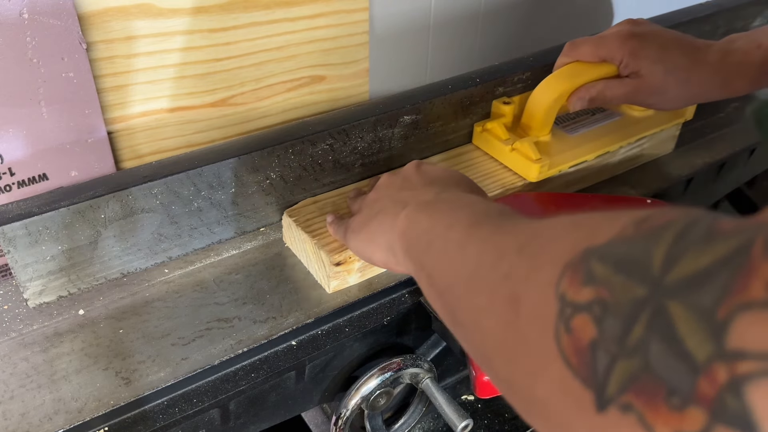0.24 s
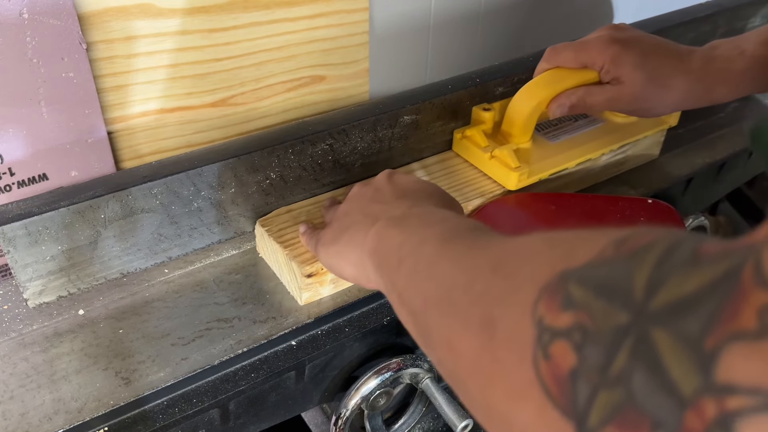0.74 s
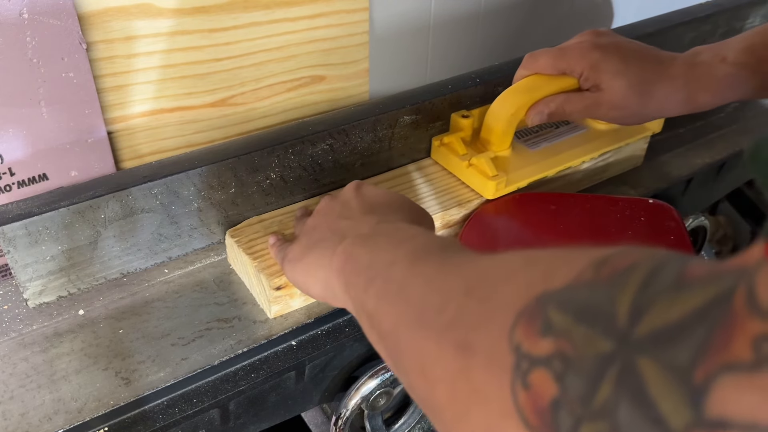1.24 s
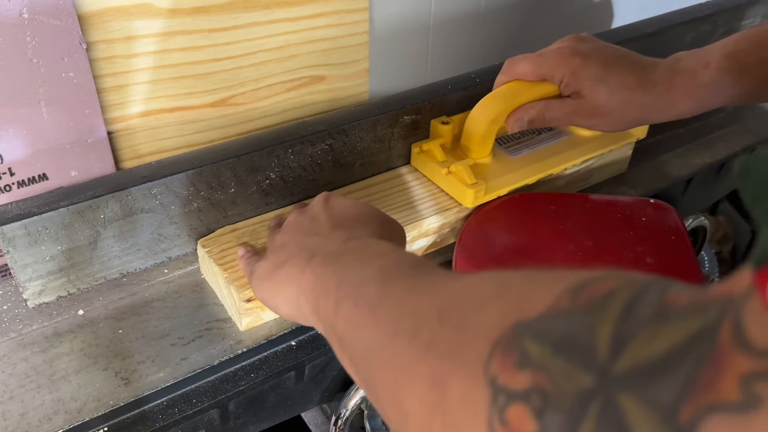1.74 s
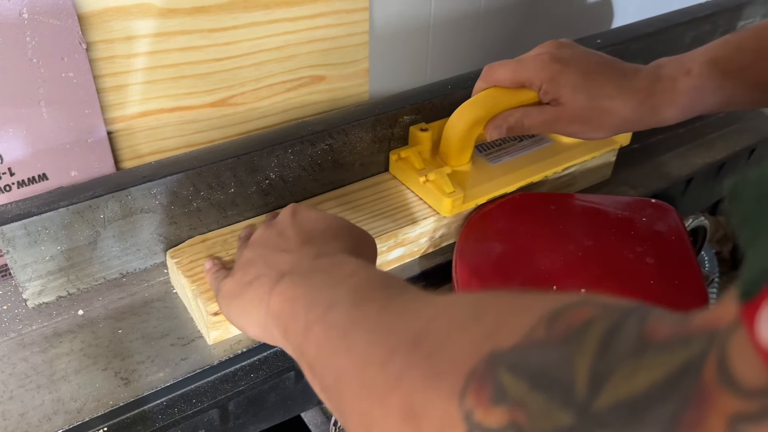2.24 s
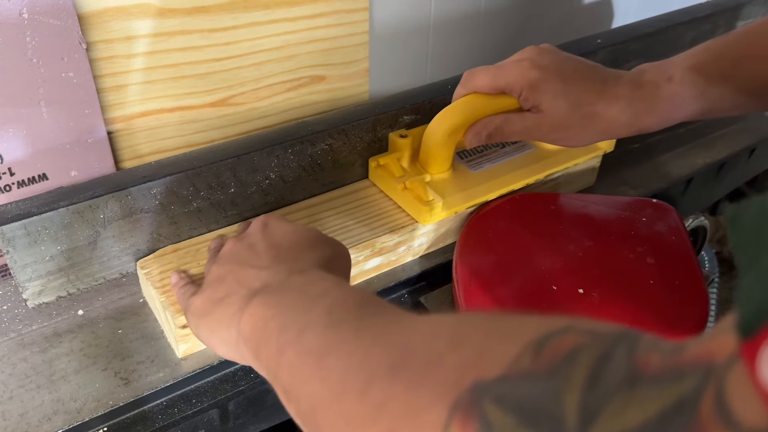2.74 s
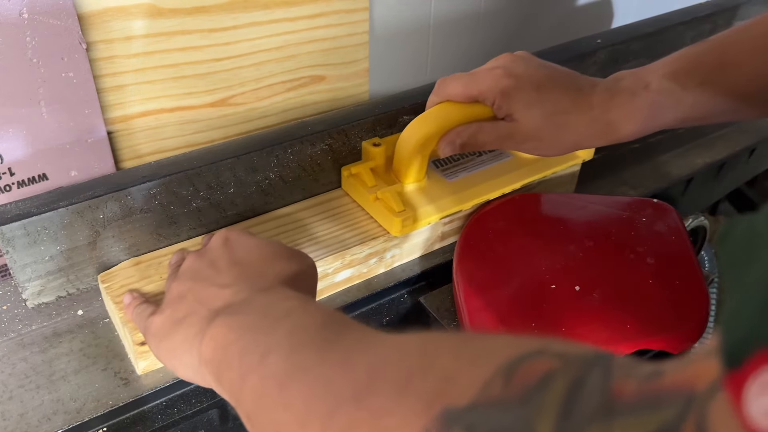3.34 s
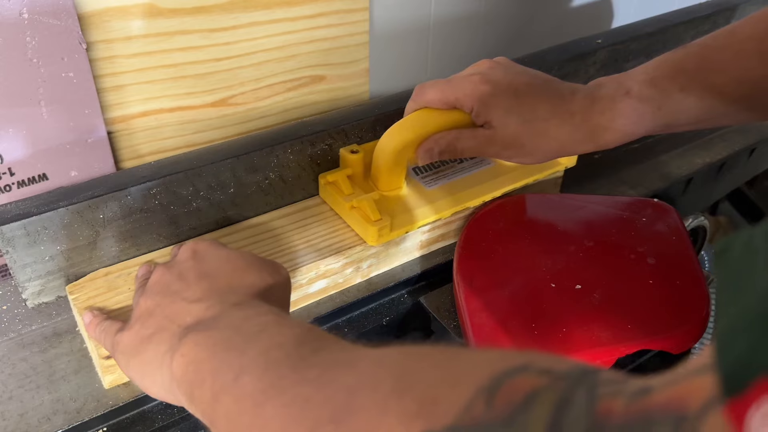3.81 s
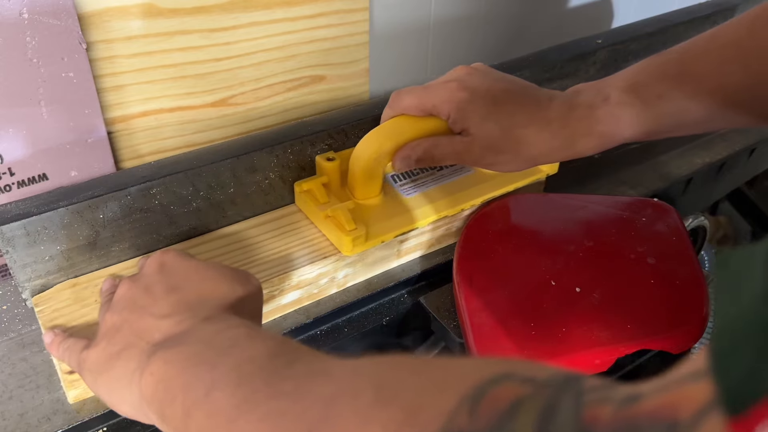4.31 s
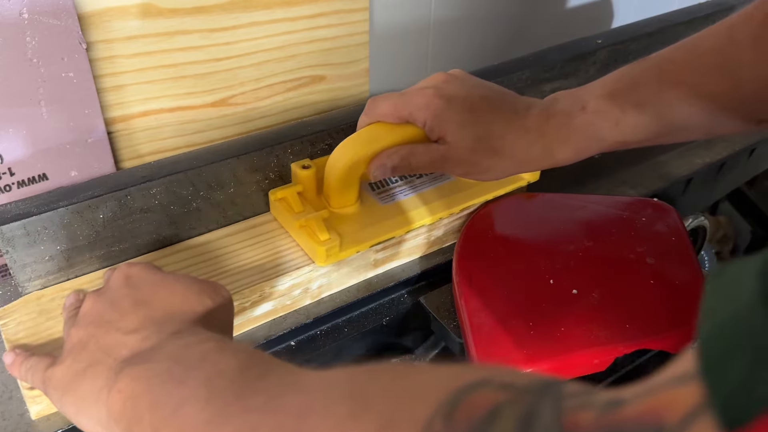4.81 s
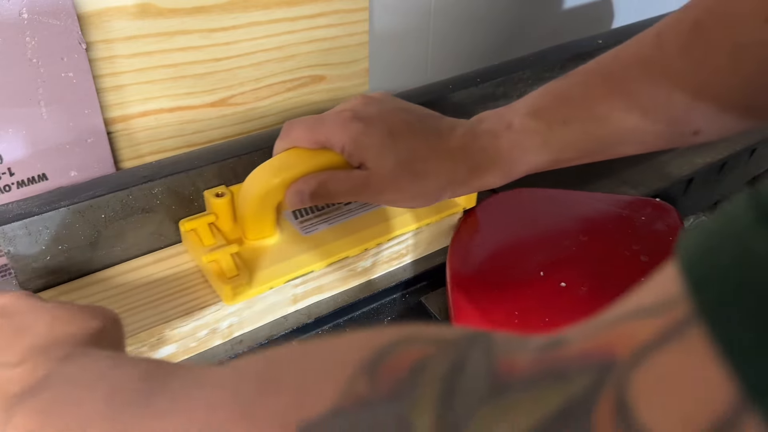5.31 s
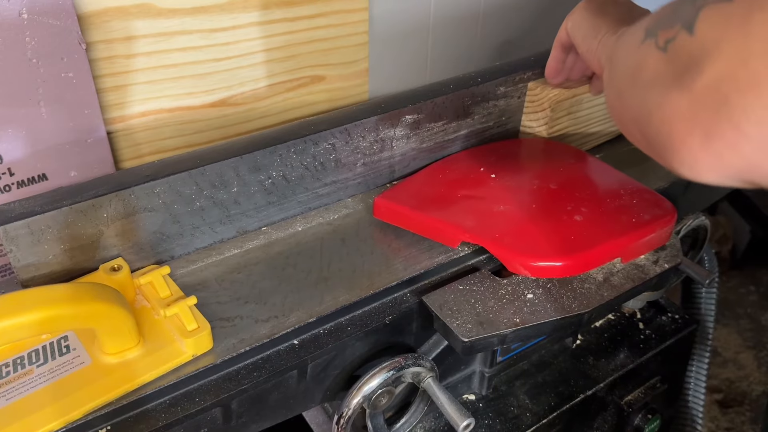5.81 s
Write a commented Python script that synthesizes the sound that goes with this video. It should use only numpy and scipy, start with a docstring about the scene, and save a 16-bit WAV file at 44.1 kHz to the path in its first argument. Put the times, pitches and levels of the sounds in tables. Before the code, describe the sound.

A loud continuous planing drone, raspy and nasal, fills the first five seconds, with spitting wood chips and changing tone as the board moves over spinning knives. It swells to a short harsh shriek, then drops suddenly to smooth, much quieter idling: low hum, soft whine and fan-like air. Close stereo microphone, short diffuse workshop echo; the idle steps up after a tiny dip.

```python
"""A three-knife jointer planes a board, heard close by in stereo, then runs free.
The knives strike the wood each turn of the cutter head: tones at multiples of its speed, and hissing chips.
The load drags the belt-driven head down; once the board leaves, the head speeds up and rings on briefly.
Then the bare knives whine in air over motor tones and rushing air; a brief dip leads to louder idling.
Tones are summed cosines, hiss and air are shaped noise, and decaying noise gives the workshop's echoes."""
import sys
import numpy as np
from scipy import signal
from scipy.fft import rfft, irfft
from scipy.io import wavfile
from scipy.ndimage import uniform_filter1d

SR = 44100
rng = np.random.default_rng(int(sys.argv[2]) if len(sys.argv) > 2 else 0)


def int16_out(signal):
    """Quantize to a 16-bit WAV file."""
    q = np.round(np.clip(np.atleast_2d(signal).T, -1, 1) * 32767)
    wavfile.write(sys.argv[1], SR, q.astype(np.int16))


def volts(x):
    """Linear amplitude factor 10**(x/20) for a level x in dB, scalar or array-like."""
    e = np.asarray(x, float) / 20
    return 10 ** e


N = 267246
T = np.arange(N) / SR  # time in seconds
JUMP_S = 5.447  # the idling turns louder here
BLOW_AT = .06  # place in the turn (0-1) where the tones of the blow meet

# Average tones of the board, relative to each other. Each row: multiple of the head speed, level in dB.
BLOW_TONES = [(4, -27), (5, -31), (7, -19), (8, -23.5), (9, -8), (10, -23), (11, -16), (12, -10.5),
              (13, -25), (14, -12), (15, -1), (16, -21.5), (17, -16.5), (18, -12.5), (19, -24), (20, -26.5),
              (21, -16.5), (22, -17), (23, -24.5), (24, -21.5), (25, -29), (26, -34), (27, -23),
              (28, -24.5), (29, -35), (30, -22.5), (31, -29), (32, -21), (33, -24), (34, -56), (35, -28),
              (36, -29.5)]
# Hard bites of a knife. Each row: start in seconds, level in dB.
CATCH = [(3.731, -17), (3.768, -19), (3.929, -19), (3.979, -13), (4.003, -14)]
# How far the left port leads the right. Each row: frequency in Hz, lead in radians.
LEAD = [(100, 0), (250, .3), (480, .3), (780, -.3), (1000, 1.3), (1640, 1.2), (2150, .7), (2840, 1.6),
        (4480, .5), (5770, 1.2), (7240, 1.5), (7920, 0), (9300, -.5), (9900, -2.4)]
# How much louder the left port is than the right. Each row: frequency in Hz, difference in dB.
LEFT = [(60, -0.5), (250, -0.5), (480, 6), (730, -1.5), (1200, 1.5), (2400, 4), (4400, 4.5), (7200, 7.5),
        (8200, 2)]


def evened(x):
    """Scales to rms 1."""
    return x / np.sqrt(np.mean(x ** 2) + 1e-20)


def read(points, hz):
    """Reads a spectrum table on a log-frequency axis."""
    f, value = np.transpose(points)
    return np.interp(np.log(hz + 1), np.log(f + 1), value)


def curves(rows):
    """Columns of a time table at every sample."""
    s, *columns = np.transpose(rows)
    return [np.interp(T, s, c) for c in columns]


def wander(rate_hz, count):
    """Slow random change of rms 1, in count rows."""
    knots = rng.standard_normal((int(N / SR * rate_hz) + 4, count)).T
    smooth = signal.resample(knots, N // 64 + 1, axis=1)
    return evened(smooth).repeat(64, 1)[:, :N]


def swell(rows, hz, t):
    """dB by which ranges of frequencies rise and sink in time, most at the middle of each range."""
    return sum(db * np.cos(2 * np.pi * (t - s) / gap) / (1 + (2 * (hz - f) / w) ** 2)
               for f, w, db, s, gap in rows)


def heard(x, spectrum):
    """Colours two signals and mixes them into what two ports hear: partly alike, with their own level and lead."""
    # How alike the ports are. Each row: frequency in Hz, likeness from 0 to 1.
    alike_ports = [(60, 0.9), (250, 0.6), (640, 0.6), (3100, 0.36), (7400, 0.62), (8200, .97)]
    hz = np.fft.rfftfreq(N, 1 / SR)
    a, b = rfft(x)
    same = np.clip(read(alike_ports, hz), 0, 1)
    side = volts(read(LEFT, hz) / 2) * np.exp(.5j * read(LEAD, hz))
    pair = np.array([a * side, (same * a + np.sqrt(1 - same ** 2) * b) / side])
    return evened(irfft(pair * volts(read(spectrum, hz)), N))


def tone(turns, hz, rms, sway_db=0, sway=0):
    """One cosine at both ports; rms is that of their mean unless they nearly cancel; sway shifts it sideways."""
    side = np.array([[.5], [-.5]])
    pair = volts(side * (read(LEFT, hz) + sway_db)) * np.exp(1j * side * (read(LEAD, hz) + sway))
    pair = pair / np.maximum(abs(pair.mean(0)), .4)
    return np.sqrt(2) * rms * abs(pair) * np.cos(2 * np.pi * turns + np.angle(pair))


def knock(s, db, modes):
    """A short blow: a struck thing rings at a few frequencies, each dying at its own pace."""
    t = np.clip(T - s, 0, .3)
    attack = 1 - np.exp(-t / .001)
    return -sum(volts(db + mode_db - 60 * t / t60) * attack * np.sin(2 * np.pi * hz * t)
                for hz, mode_db, t60 in modes)


def since_throb(x):
    """A running count, zero where the idle throb is loudest, so that the whine and a motor tone meet there."""
    # Moment of that throb in seconds: before the jump, after it.
    throb_s = (5.345, 5.54)
    return x - np.where(T < JUMP_S, *np.interp(throb_s, T, x))


def board_levels(order, t):
    """dB of each multiple of the head speed, as the board favours some tones and starves others."""
    # Ranges that swell and fade as the knives pass along the board. Each row: centre in Hz,
    # width in Hz, depth in dB, loudest moment in seconds, seconds from swell to swell.
    board_swell = [(415, 290, 12.5, 7.9, 13.4), (686, 62, 14, 0.68, 3.93), (1008, 91, 17, 4.16, 6.33),
                   (1181.5, 111, 17.5, 6.67, 12.2), (1137, 434, 15.5, 0.72, 5.93),
                   (1489, 163, 13, 1.92, 6.1), (1604, 406, 20, 5.09, 7.5), (1743, 127, 16.5, 0.89, 6.02),
                   (1980, 86, 5, 2.37, 2.13), (2360, 860, 9.5, 1.44, 3.63), (2650, 89, 13.5, 6.34, 10.9),
                   (3020, 1900, 5, 0.027, 2.39), (2424, 50, 4, 0.45, 3.6), (2672, 50, 4.5, 4, 3.6),
                   (1780, 43, 7.5, 2.75, 5)]
    # Near the end the tones shift into a growl. Each row: multiple of the head speed, change in dB.
    growl = [(4, 7), (5, 8), (7, 3), (8, 3), (11, 3), (13, 10), (14, -1.5), (16, -13)]
    # Tones between the knife tones near 1 kHz, as the knives bite unevenly. Each row: seconds, change in dB.
    uneven = [(3.2, 1.5), (3.5, 4.5), (3.62, 2), (3.77, 5.5), (3.81, -14), (3.9, -1), (4.01, -4),
              (4.05, -8), (4.4, -2.5), (4.7, 1)]
    growl_s, growl_rise_s = 3.7, .14
    end_s, end_hz, end_octaves_per_s, end_db, end_rise_s = 4.815, 1420, 6.2, 9.5, .034
    dull_hz, dull_s, dull_fall_s, dull_db = 1150, 4.845, .047, -30

    hz = order[:, None] * 81
    between = hz % 243 > 0  # not a multiple of three: a tone between the knife tones
    levels = np.transpose(BLOW_TONES)[1][:, None] + swell(board_swell, hz, t)
    growl_change = sum(db * (order[:, None] == k) for k, db in growl)
    levels = levels + growl_change * np.clip((t - growl_s) / growl_rise_s, 0, 1)
    levels = levels - 10 * np.log10((volts(levels) ** 2).sum(0))  # the same total power at all times

    # the short last piece of board rings ever higher and louder
    since = np.maximum(t - end_s, 0)
    ring_hz = end_hz * 2 ** (end_octaves_per_s * since)
    near_ring = np.exp(-(np.log(hz / ring_hz) / .2) ** 2)
    levels = levels + np.minimum(since / end_rise_s, 1) * end_db * np.where(between, .75, 1) * near_ring

    # the board's main ring dies first
    near_main = np.exp(-(np.log(hz / dull_hz) / .11) ** 2)
    levels = levels + np.clip((t - dull_s) / dull_fall_s, 0, 1) * dull_db * near_main
    return levels + (between & (hz > 850) & (hz < 1400)) * np.interp(t, *np.transpose(uneven))


def board_chatter(turns):
    """Four rows of uneven blow strength: a chattering board lifts on every second turn and shakes at random."""
    # Bursts of chatter. Each row: peak in seconds, strength added, rise in seconds.
    bursts = [(3.63, .08, .06), (3.77, .12, .06), (3.93, .12, .03), (4.0, .15, .04)]
    always, fall_s = .11, .03
    bounce = np.cos(np.pi * turns)
    shake = wander(70, count=4)
    shake = shake - uniform_filter1d(shake, 3000, axis=1)
    strength = always + sum(a * np.exp(-abs(T - s) / np.where(T < s, rise, fall_s))
                            for s, a, rise in bursts)
    return strength * (.5 * bounce + 1.2 * shake)


def knives(turns, blows_db, left_db):
    """Knife blows as tones at multiples of the head speed, gliding in strength as the board travels."""
    # Hum of the passing knives, whatever the cut. Each row: multiple of the head speed, level in dB.
    passing_hum = [(3, -34), (6, -38)]
    # Ranges where the board moves against the blow. Each row: from Hz, to Hz.
    opposed = [(440, 600), (1500, 2000)]
    # all in cycles: swing of the blow, lead or lag of the tones between the knife tones,
    # scatter, extra scatter of the tones between the knife tones
    swing, between_lead, scatter, loose_scatter = .18, .08, .07, .2
    loose_s, loose_rise_s = 1.9, 1.2  # when that extra scatter starts, how long it grows

    t = T[::256]
    order = np.transpose(BLOW_TONES)[0]
    levels = board_levels(order, t)
    drift = wander(.4, count=2 * len(order)).reshape(2, -1, N)
    start = rng.standard_normal(len(order))
    shake = board_chatter(turns)
    loose = loose_scatter * np.clip((T - loose_s) / loose_rise_s, 0, 1)
    out = sum(tone(k * (turns - BLOW_AT), k * 81, volts(db)) for k, db in passing_hum)
    for k, db, pan, lead, s in zip(order, levels, *drift, start):
        roughness = 1 + shake[int(k) // 10] * min(k / 10, 1) ** 2
        size = roughness * volts(np.interp(T, t, db) + blows_db)
        phase = swing + between_lead * (0, -1, 1)[int(k) % 3]
        phase = phase + (scatter + loose * (k % 3 > 0)) * s
        phase = phase + .5 * any(lo < k * 81 < hi for lo, hi in opposed)
        out += tone(k * (turns - BLOW_AT) + phase, k * 81, size, 2.5 * pan + left_db, .4 * lead)
    return out


def hard_bites(turns):
    """Single hard bites: the first knife catches the wood and the board rings shortly."""
    # What a hard bite rings with. Each row: frequency in Hz, level in dB, seconds to fall by 60 dB.
    board_modes = [(700, -5, .012), (890, 0, 0.018), (1143, 1, 0.018), (1394, -4, 0.014)]
    out = 0
    for s, db in CATCH:
        nearest_turn = np.round(np.interp(s, T, turns))
        out = out + knock(np.interp(nearest_turn + BLOW_AT, turns, T), db, board_modes)
    return out


def repeating_grain(turns):
    """Noise that repeats turn after turn, partly knife after knife, and slowly changes with the grain."""
    each_knife = np.tile(rng.standard_normal((9, 2, 182)), 3)
    each_turn = rng.standard_normal((9, 2, 546))
    grain = signal.resample(.11 * each_knife + each_turn, 4368, axis=2)
    place, at = np.arange(4368), turns % 1 * 4367
    which = T * 8 / T[-1]  # fades through the nine grains in turn
    out = 0
    for k, pair in enumerate(grain):
        share = np.cos(np.pi / 2 * np.clip(which - k, -1, 1))
        out = out + share * np.array([np.interp(at, place, g) for g in pair])
    return out


def chips(turns, hiss_db, bright, left_db):
    """Chip hiss: noise puffed out at each knife, partly repeating turn after turn while the grain stays alike."""
    # The three knives. Each row: place in the turn from 0 to 1, bite in dB, length in turns.
    knife_bites = [(.03, -9, 0.094), (.36, -17, 0.19), (.69, -11.5, 0.062)]
    # Sharp cracks that open the bites. Each row: place in the turn from 0 to 1, level in dB
    # before the hiss raises or lowers it, decay in turns.
    crack_rows = [(.0, -7.5, 0.012), (.07, -13, 0.016), (.34, -19, .02), (0.669, -13.5, 0.026)]
    # Colour of the repeating part of the noise. Each row: frequency in Hz, gain in dB.
    repeat_share = [(2900, -30), (3150, 3), (4500, 2), (6000, -1), (7500, -8)]
    # Resonances in the hiss. Each row: centre in Hz, width in Hz, boost in dB.
    hood_rings = [(3526, 93, 7), (3970, 350, 4), (5120, 1300, 3.5), (5930, 130, 4), (6670, 300, 3),
                  (7220, 370, 6), (8110, 310, 7.5), (8700, 220, 8.5)]
    # Ranges of hiss that swell and fade. Each row: centre in Hz, width in Hz, depth in dB,
    # loudest moment in seconds, seconds from swell to swell.
    hiss_swell = [(3440, 260, 1.5, 1.9, 12), (4640, 1600, 2, 0.53, 7.5), (5400, 880, 4, 6.3, 11.2),
                  (6020, 290, 3.5, 4.1, 8.2), (7700, 390, 1.5, 6.7, 7.1), (8660, 270, 1.5, 3.9, 4.7)]
    # Shape of the dull chip noise. Each row: frequency in Hz, relative level in dB per Hz.
    dull_shape = [(200, -26), (500, -13), (1200, 7.5), (2000, -0.5), (3000, -14.5), (5000, -12.5),
                  (7000, -5), (8800, -4.5), (10500, -1), (15000, -28.5)]
    # Shape of the bright chip noise. Each row: frequency in Hz, relative level in dB per Hz.
    bright_shape = [(200, -23), (500, -21.5), (1200, -22), (2600, 2.5), (3800, -5.5), (5500, -4.5),
                    (7000, -9), (8800, -9), (10500, -7), (15000, -8)]
    soft_hiss_db = -31.5

    # the louder the hiss, the less of it lies between the bites and the more it cracks
    bite = .32 * volts(.51 * (soft_hiss_db - hiss_db))
    for at, db, length in knife_bites:
        distance = (turns - at + .5) % 1 - .5
        bite = bite + volts(db) * np.exp(-.5 * (distance / length) ** 2)
    crack = sum(volts(db) * np.exp(-((turns - at) % 1) / decay) for at, db, decay in crack_rows)
    bite = bite + volts(1.5 * (np.minimum(hiss_db, -27) - soft_hiss_db)) * crack

    hz = np.fft.rfftfreq(N, 1 / SR)
    repeating = irfft(rfft(bite * repeating_grain(turns)) * volts(read(repeat_share, hz)), N)
    splinter = volts(1.4 * wander(150, count=1))
    drive = repeating + bite * splinter * rng.standard_normal((2, N))
    boost_db = sum(db / (1 + (2 * (hz - f) / w) ** 2) for f, w, db in hood_rings)
    drive = irfft(rfft(drive) * volts(boost_db), N)
    bins, t, z = signal.stft(drive, SR, nperseg=1024)
    z = z * volts(swell(hiss_swell, bins[:, None], t))
    drive = signal.istft(z, SR, nperseg=1024)[1][:, :N]

    share = np.clip(bright, 0, 1)
    mix = np.sqrt(1 - share) * heard(drive, dull_shape) + np.sqrt(share) * heard(drive, bright_shape)
    return volts(hiss_db + np.array([[.5], [-.5]]) * left_db) * mix


def ring_on(turns, since):
    """Knife tones linger, wavering, after the last bite and rise as the head speeds up."""
    # Each row: multiple of the head speed, level in dB before waver and decay.
    lingering = [(6, -30.5), (9, -38), (12, -30), (15, -43), (18, -39), (21, -52), (24, -39), (27, -45),
                 (30, -38)]
    t60_s = .37  # time to fall by 60 dB
    waver = wander(25, count=len(lingering))
    size = np.clip(since / .03, 0, 1) * volts(-60 * np.maximum(since, 0) / t60_s)
    return sum(tone(k * turns + rng.random(), k * 82, size * volts(db + 3.3 * w))
               for (k, db), w in zip(lingering, waver))


def guard_knock():
    """A dull knock after the board has left, perhaps the guard swinging shut: four ringing modes."""
    # Each row: frequency in Hz, level in dB, seconds to fall by 60 dB.
    guard_modes = [(497, -5, .08), (747, -6.5, 0.15), (1010, 3, 0.066), (1390, -11, 0.042)]
    return knock(4.957, -27, guard_modes)


def whine(turns, free):
    """Bare knives chop the air once the board has uncovered them: tones at multiples of the head speed."""
    # Each row: multiple of the head speed, level in dB before the jump, level in dB after it.
    air_tones = [(3, -36, -33), (5, -55, -47), (6, -39, -32), (8, -58, -55), (9, -43, -40), (10, -53, -58),
                 (12, -49, -38), (15, -56, -54), (18, -58, -48), (21, -62, -58), (24, -65, -58),
                 (27, -64, -57)]
    bare_left_db, bare_lead = -7, -.21  # from further right: left over right, radians per multiple
    waver = wander(3.2, count=len(air_tones))
    count = since_throb(turns)
    out = np.zeros((2, N))
    for (k, before_db, after_db), w in zip(air_tones, waver):
        size = free * volts(np.where(T < JUMP_S, before_db, after_db) + .17 * w)
        phase = rng.random() * (k > 3)  # the lowest tone stays in step with the throb
        out += tone(k * count + phase, k * 83, size, bare_left_db * (3 < k < 15), bare_lead * k * (k > 3))
    return out


def motor(speed, free):
    """Motor, belt and fan tones; the motor slows less than the head because the belt slips."""
    # Each row: free-running frequency in Hz, level in dB under load, level in dB free before the jump.
    motor_tones = [(59, -54, -53), (79, -61, -54), (118.4, -62, -58), (197.2, -60, -57),
                   (236.7, -62, -43.5), (276.2, -62, -53), (295.8, -62, -53), (414.5, -62, -52),
                   (434, -62, -54), (461, -43, -45), (618, -56, -62), (1223, -58, -51)]
    # The lowest tone sinks under the long cut. Each row: seconds, change in dB.
    low_sink = [(0, 2.5), (1.6, 0), (2.5, -6), (3.3, -3), (4.2, -9), (4.9, -2), (5.1, 0)]
    clock = np.cumsum(1 - .44 * (1 - speed / speed[-1])) / SR
    count = since_throb(clock)
    low_db, = curves(low_sink)
    waver = wander(2.6, count=len(motor_tones))
    out = np.zeros((2, N))
    for (hz, load_db, free_db), w in zip(motor_tones, waver):
        db = load_db + free * (free_db - load_db) + .5 * w
        db = db + 1.5 * (T > JUMP_S) + (round(hz) == 59) * low_db
        phase = rng.random() * (round(hz) != 237)  # this one beats with the lowest knife whine
        out += tone(hz * count + phase, hz, volts(db))
    return out


def rush(free):
    """Broad air noise of head, belt and motor fan, fluttering a little as the unloaded belt flaps."""
    # Shape of the noise. Each row: frequency in Hz, relative level in dB per Hz.
    air_shape = [(25, -45), (45, -40), (70, -18.5), (150, -10), (250, -7.5), (380, -7), (500, -4.5),
                 (1000, -2.5), (1600, -3), (1900, -11.5), (4000, -16), (8500, -23), (10500, -24),
                 (15500, -32)]
    load_db, free_db, after_jump_db = -34.5, -35.5, -32
    flap_hz, flap_db = 32, .7
    air = rng.standard_normal((2, N)) * volts(.8 * wander(60, count=1))
    db = np.where(T < JUMP_S, load_db + free * (free_db - load_db), after_jump_db)
    flap = free * flap_db * np.sin(2 * np.pi * flap_hz * T)
    return volts(db + flap) * heard(air, air_shape)


def shop(x):
    """Diffuse workshop echoes, the treble dying first: three random tails fade in and out in turn, steadily."""
    # Each row: frequency in Hz, seconds to fall by 60 dB.
    echo_fall = [(300, 1), (1500, 1), (8000, 0.3)]
    change_s = 1.3
    hz, t, z = signal.stft(rng.standard_normal((3, 2, SR // 2)), SR, nperseg=256)
    late = (t > .008) * (hz > 400)[:, None]
    decay = volts(-60 * t / read(echo_fall, hz)[:, None])
    tails = signal.istft(z * late * decay, SR, nperseg=256)[1]
    shares = np.sqrt(2 / 3) * np.cos(np.pi * (T / change_s + np.arange(3)[:, None] / 3))
    return sum(signal.fftconvolve(s * x, tail / np.linalg.norm(tail[0]), axes=1)[:, :N]
               for s, tail in zip(shares, tails))


def scene():
    """Cutting until the board's end passes the head, idling after."""
    # Head speed under load. Each row: seconds, cutter head turns per second.
    load_speed = [(0, 80.8), (.4, 80.85), (1.3, 80.72), (1.6, 80.87), (2.0, 80.7), (2.4, 80.83),
                  (3.2, 80.82), (3.9, 80.78), (4.25, 81.1), (4.6, 81.35), (4.83, 81.4)]
    # The cut. Each row: seconds, knife blows in dB, chip hiss in dB, brightness of the hiss
    # from 0 to 1, left over right in dB.
    cut_rows = [(0, -23, -31.5, 0.9, -1.5), (.8, -23.5, -32, 0.8, -3), (1.57, -24.5, -32, 0.24, -2),
                (2.13, -25.5, -31.5, 0.42, -1), (2.7, -26.5, -32.5, 0.56, -1), (3.52, -27, -29, 0.36, -1.5),
                (3.97, -24.5, -30, 0.32, 0.5), (4.46, -21, -27.5, 0.78, 1), (4.79, -19.5, -24, 0.9, 1),
                (4.86, -20, -20, 0.2, 0), (4.875, -22.5, -16.5, 0.56, 1.5), (4.9, -19, -28, .8, -9)]
    leave_s, free_turns_per_s, spin_up_s = 4.82, 83.27, .075
    loaded, = curves(load_speed)
    slowed = np.exp(-np.maximum(T - leave_s, 0) / spin_up_s)
    speed = free_turns_per_s + (loaded - free_turns_per_s) * slowed
    turns = np.cumsum(speed) / SR
    # the last hard bite falls on the first knife
    turns = turns - np.interp(CATCH[-1][0], T, turns) % 1 + BLOW_AT

    blows_db, hiss_db, bright, left_db = curves(cut_rows)
    free = np.interp(T, [4.86, 4.95], [0, 1])
    striking = np.interp(T, [4.87, 4.915], [1, 0])
    biting = np.interp(T, [4.875, 4.9], [1, 0])
    blows = striking * knives(turns, blows_db, left_db) + hard_bites(turns) + guard_knock()
    hiss = biting * chips(turns, hiss_db, bright, left_db)
    echoes = shop(volts(-18) * blows + volts(-11.5) * hiss)
    idling = ring_on(turns, T - 4.87) + whine(turns, free)
    return blows + hiss + echoes + idling + motor(speed, free) + rush(free)


def top_cut(x):
    """Nothing passes above the cut-off."""
    return signal.sosfilt(signal.butter(12, 15840, fs=SR, output="sos"), x)


def record(dry):
    """The top octave of the right channel is the left one turned in phase; a dip leads to the louder idling."""
    # Top octave: near 11 kHz the level lies in the difference of the channels, above 13 kHz
    # in their sum. Each row: frequency in Hz, phase turn between the channels in radians.
    top_turn = [(9900, -2.4), (10750, -np.pi), (12300, -np.pi), (13000, -2 * np.pi)]
    hz = np.fft.rfftfreq(N, 1 / SR)
    left, right = rfft(dry)
    top = np.interp(hz, [9600, 10400], [0, 1])
    right = (1 - top) * right + top * left * np.exp(-1j * read(top_turn, hz))
    channels = irfft([left, right], N)
    dip = np.interp(T, [JUMP_S - .017, JUMP_S, JUMP_S + .004], [1, .45, 1])
    return top_cut(channels * dip)


dry = scene()
out = record(dry)
int16_out(out)
```